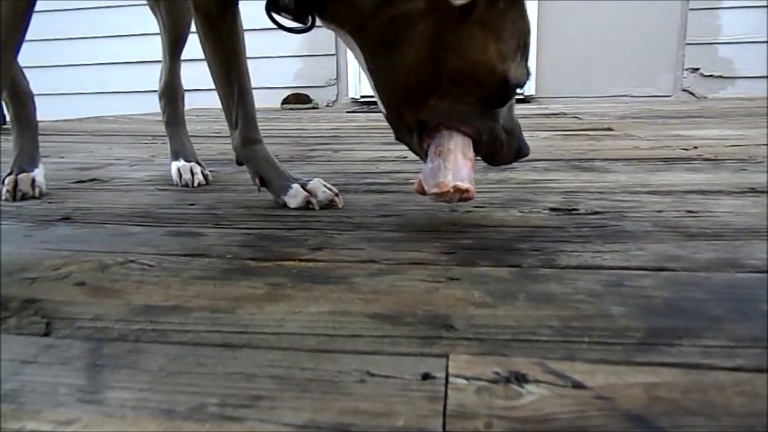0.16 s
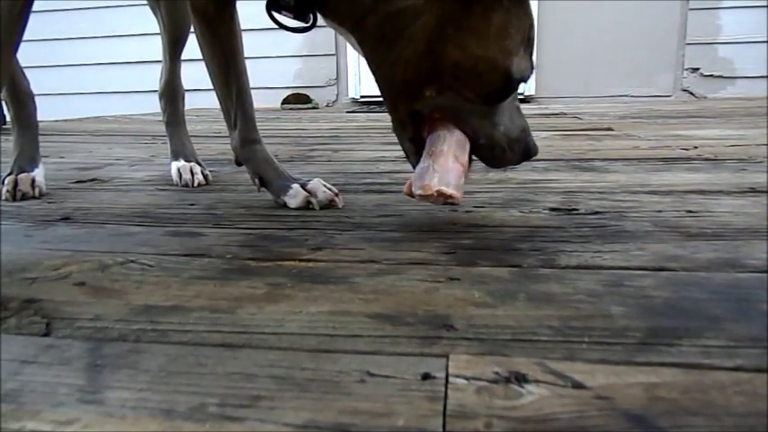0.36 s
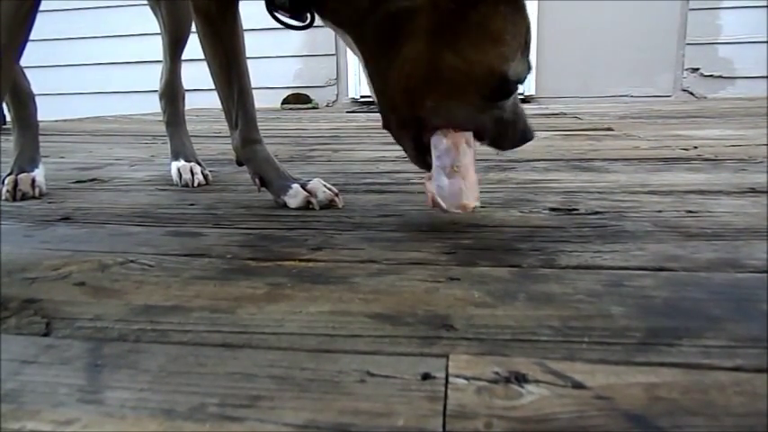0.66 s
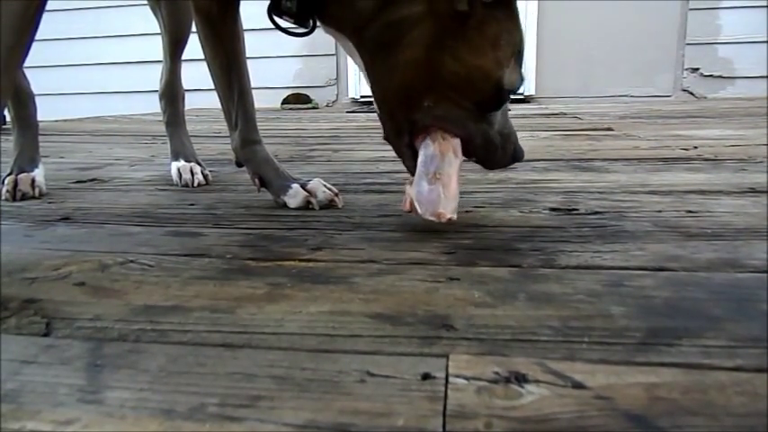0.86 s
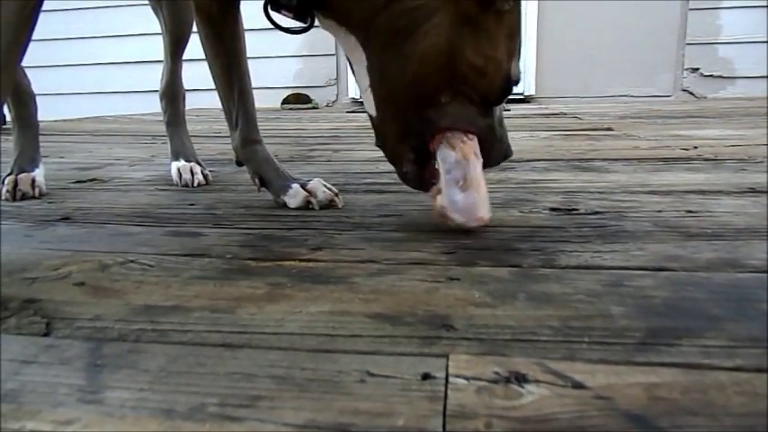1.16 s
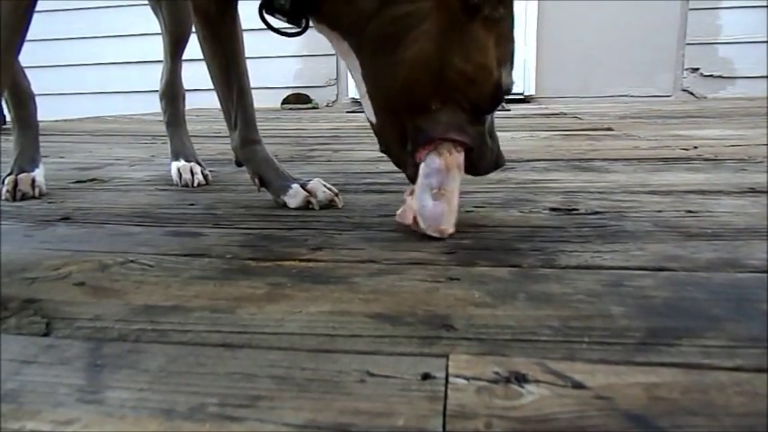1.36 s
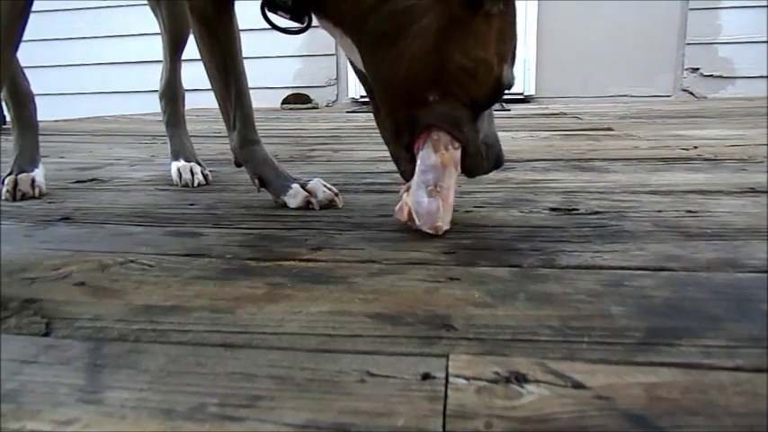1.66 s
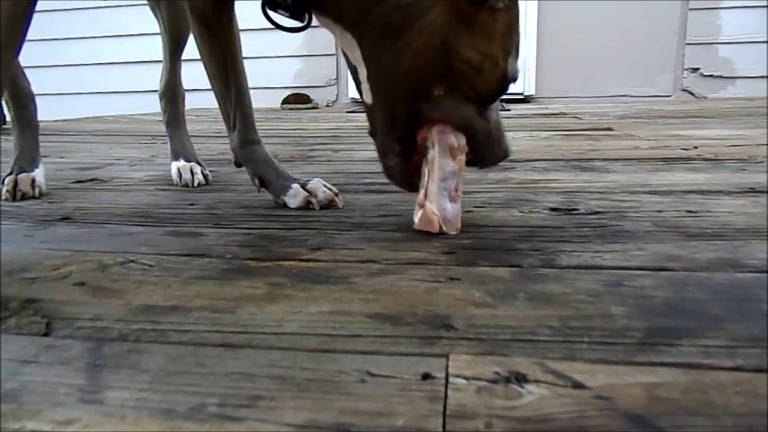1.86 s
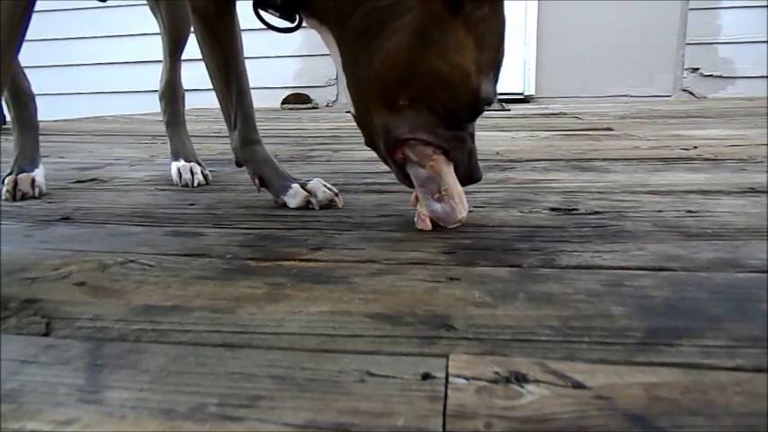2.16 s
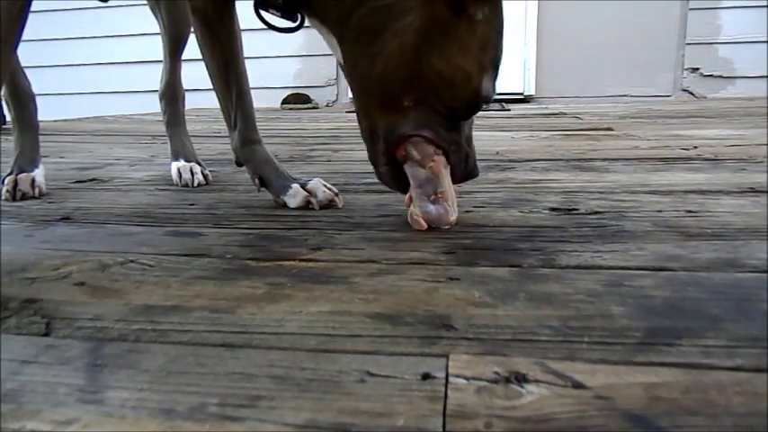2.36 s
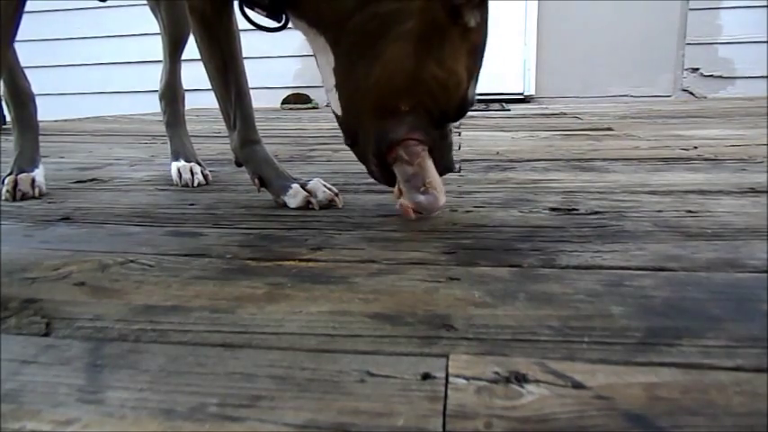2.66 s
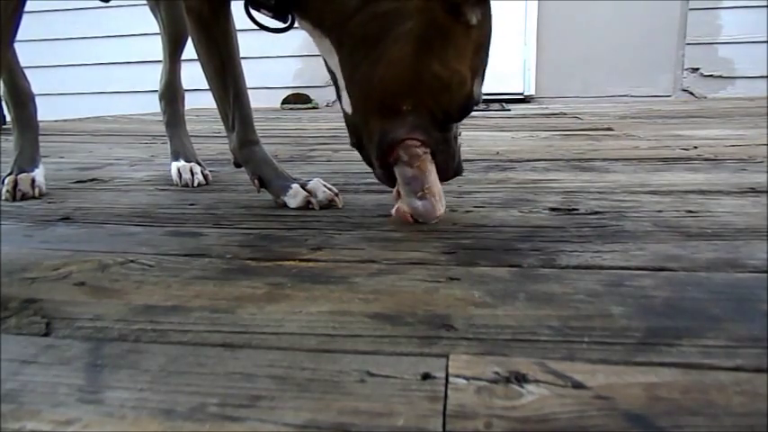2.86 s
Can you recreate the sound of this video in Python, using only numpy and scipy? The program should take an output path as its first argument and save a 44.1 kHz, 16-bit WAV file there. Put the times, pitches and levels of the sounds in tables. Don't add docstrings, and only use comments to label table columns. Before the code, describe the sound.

A dog crunches a raw bone close to a small stereo microphone on a wooden deck: loud snaps early and midway, gristly grinding and faint lip smacks between, then gusts thump the right channel over soft outdoor hiss.

```python
import sys
import numpy as np
from scipy import signal
from scipy.io import wavfile
from scipy.ndimage import uniform_filter1d

SR = 44100
rng = np.random.default_rng(int(sys.argv[2]) if len(sys.argv) > 2 else 0)


def dump_mix(stems):
    frames = np.atleast_2d(stems).T
    limited = np.clip(frames, -1, 1)
    pcm = np.round(limited * 32767).astype(np.int16)
    wavfile.write(sys.argv[1], SR, pcm)


def amplitude_ratio(level_db):
    exponent = np.asarray(level_db, float) / 20
    return 10 ** exponent


N = 132300


def evened(x):
    return x / np.sqrt(np.mean(x ** 2) + 1e-20)


def peak_evened(x):
    return x / np.sqrt(uniform_filter1d(x ** 2, 80).max())


def smooth_noise(count, width):
    return evened(uniform_filter1d(uniform_filter1d(rng.standard_normal(count), width), width))


def read(points, hz):
    f, value = np.transpose(points)
    return np.interp(np.log(hz + 1), np.log(f + 1), value)


def curve(points):
    return amplitude_ratio(np.interp(np.arange(N) / SR, *np.transpose(points)))


def add(mix, s, sound):
    part = mix[round(s * SR):][:len(sound)]
    part += sound[:len(part)]


def colour(x, points):
    hz = abs(np.fft.fftfreq(4096, 1 / SR))
    log_gain = np.log(amplitude_ratio(read(points, hz)))
    taps = np.fft.ifft(np.exp(np.conj(signal.hilbert(log_gain)))).real[:1024]
    return signal.oaconvolve(x, taps)[:len(x)]


# frequency in Hz, density in dB per Hz.
AIR_COLOUR = [(53, -43), (100, -17), (200, -9), (453, 0), (550, -5.5), (667, -7.5), (1050, -11),
              (15500, -21)]
# frequency in Hz, left-right likeness from 0 to 1.
LIKENESS = [(60, 0.57), (380, 0.99), (2380, 0.028), (15000, 0.024)]
# time in seconds, gain in dB.
GAIN = [(0, 1.5), (.5, -2.5), (1.15, -4.5), (1.3, 1), (1.85, -0.5), (1.92, -12.5), (2.08, -13.5),
        (2.12, -1.5), (2.53, -6.5), (2.65, -2.5), (3, -0.5)]
AIR_DB = -42


def air():
    frames, hz = N // 128 + 5, np.fft.rfftfreq(512, 1 / SR)
    a, b, c, d, patches = rng.standard_normal((frames, 257, 5)).T
    patches = evened(uniform_filter1d(uniform_filter1d(patches, 30, 0), 12, 1))
    hiss_swell = smooth_noise(frames, 12) * (hz > 2500)[:, None]
    same = np.clip(read(LIKENESS, hz), -1, 1)[:, None]
    left = a + 1j * b
    right = same * left + np.sqrt(1 - same ** 2) * (c + 1j * d)
    level_db = read(AIR_COLOUR, hz)[:, None] + 1.7 * patches + 0.9 * hiss_swell
    spectra = np.array([left, right]) * amplitude_ratio(level_db)
    wash = signal.istft(spectra, nperseg=512, noverlap=384)[1][:, :N]
    return amplitude_ratio(AIR_DB) * curve(GAIN) * evened(wash)


# time in seconds, level in dB.
BREEZE = [(0, -58), (.5, -47.5), (.75, -39.5), (1.1, -28.5), (1.2, -46.5), (1.5, -38.5), (1.82, -42),
          (1.88, -23), (2.3, -42), (2.46, -30.5), (2.5, -60.5), (2.56, -33.5), (2.75, -29), (2.8, -45),
          (2.86, -28.5), (3, -35.5)]
BREEZE_HZ, BREEZE_WIDTH_HZ, LUMPS_DB = 212.3, 193, 3.5


def breeze():
    edges = [BREEZE_HZ - BREEZE_WIDTH_HZ / 2, BREEZE_HZ + BREEZE_WIDTH_HZ / 2]
    band = signal.butter(2, edges, "band", fs=SR, output="sos")
    lumps = amplitude_ratio(LUMPS_DB * smooth_noise(N, 400))
    rumble = signal.sosfilt(band, rng.standard_normal(N))
    return curve(BREEZE) * evened(lumps * rumble)


def eddy(s, db, hz):
    t = np.arange(-500, 700) / SR
    phase, side = rng.random(2)
    turns = t * hz / 0.8
    swell = np.exp(-turns ** 2 * np.where(turns < 0, 1.8, 1.3))
    thump = swell * np.cos(2 * np.pi * (hz * t + 0.22 * (phase - 0.5))) * np.sign(side - 0.5)
    return s + t[0], amplitude_ratio(db) * thump


# start in seconds, level in dB.
SLAPS = [
    (1.905, -7.5),
    (1.9235, -16),
    (1.9995, -11),
    (2.002, 0),
    (2.0332, -13.5),
    (2.4532, -7.5),
    (2.455, -5.5),
    (2.737, -12.5),
]
SLAP_HZ, SLAP_DECAY_S = 720, 0.00091


def slap(s, db):
    t = np.arange(400) / SR
    envelope = (1 - np.exp(-t / 0.00005)) * np.exp(-t / SLAP_DECAY_S)
    return s, amplitude_ratio(db) * envelope * np.sin(2 * np.pi * SLAP_HZ * t)


# centre
# in seconds, level in dB, pitch in Hz.
EDDIES = [(0.3209, -21, 220), (0.3553, -11.5, 247), (0.7043, -20.5, 206), (0.785, -17.4, 246),
          (0.884, -17.8, 278), (0.9035, -17, 259), (0.9102, -25, 244), (0.989, -13.5, 228),
          (1.0008, -20, 240), (1.0364, -26, 199), (1.0503, -22, 234), (1.0521, -7.5, 254),
          (1.06, -25, 231), (1.0773, -16, 248), (1.0986, -26.5, 297), (1.1058, -19.9, 298),
          (1.113, -11.5, 275), (1.122, -9, 273), (1.4615, -18, 288), (1.8696, -17, 236),
          (1.8794, -13, 332), (1.8902, -11.5, 300), (1.8946, -14, 217), (1.9067, -5, 377),
          (1.918, -6.5, 370), (1.9264, -9, 254), (1.9388, -12, 312), (1.9458, -22, 371),
          (1.9685, -11.8, 297), (1.9799, -11.4, 280), (1.988, -19, 248), (2.0038, -5.5, 304),
          (2.0117, -11, 274), (2.0199, -18, 298), (2.0351, -12, 283), (2.0729, -22, 267),
          (2.0848, -20, 290), (2.0995, -23, 264), (2.1111, -15.5, 245), (2.125, -11, 324),
          (2.149, -19, 278), (2.1605, -19, 265), (2.1829, -5.5, 312), (2.191, -5, 370),
          (2.211, -27, 292), (2.219, -15.5, 309), (2.2602, -11.5, 256), (2.2666, -14, 306),
              (2.2728, -2, 330), (2.2838, -9, 268), (2.318, -19, 259), (2.3312, -10.5, 343),
              (2.3447, -13.1, 324), (2.4053, -24, 277), (2.4151, -11.5, 301), (2.4212, -24, 260),
              (2.4404, -21.1, 333), (2.4493, -17, 207), (2.4557, -7.5, 292), (2.4629, -14.5, 280),
              (2.562, -24, 345), (2.58, -12, 334), (2.6255, -32, 221), (2.641, -21.0, 210),
              (2.6606, -13.5, 312), (2.6707, -8.5, 370), (2.679, -11.5, 229), (2.694, -10.7, 308),
              (2.706, -12, 274), (2.72, -19.8, 259), (2.7305, -27, 243), (2.7381, -9, 290),
              (2.75, -28, 207), (2.8473, -12, 259), (2.866, -25, 239), (2.913, -16, 262),
              (2.9688, -19, 250), (2.9946, -22, 261)]
LEAK_DB = -33


def wind():
    right = breeze()
    for row in EDDIES:
        add(right, *eddy(*row))
    for row in SLAPS:
        add(right, *slap(*row))
    return np.array([amplitude_ratio(LEAK_DB) * right, right])


# start in seconds, level in dB, pitch in Hz.
SMACKS = [
    (0.093, -29, 13800),
    (0.379, -38, 11600),
    (.387, -40, 10600),
    (0.716, -28, 6480),
    (1.927, -37, 12400),
]


def smack(s, db, hz):
    t = np.arange(900) / SR
    fizz = uniform_filter1d(rng.standard_normal(len(t)), 14) * 4 * np.sin(2 * np.pi * hz * t)
    click_and_tail = np.exp(-t / 0.0011) + 0.29 * np.exp(-t / 0.01)
    return s, amplitude_ratio(db) * fizz * click_and_tail


# time in seconds, level in dB.
GRIND = [(0, -48), (.08, -33), (.3, -44.5), (.85, -42), (1.44, -42), (1.5, -33.5), (1.66, -39.5),
         (1.8, -50), (2.08, -56.5), (2.13, -63), (2.26, -41.5), (2.4, -55.5), (2.67, -43.5), (2.8, -55),
         (2.86, -47.5), (3, -44.5)]
# frequency in Hz, level in dB.
GRIND_COLOUR = [(300, -25.5), (800, 2.5), (1500, -7.5), (3000, -10), (6000, -14), (15000, -11)]
TICKS_PER_S = 1400


def grinding():
    tick_level = amplitude_ratio(4 * np.minimum(rng.exponential(1, N), 2.5))
    ticks = (rng.random(N) < TICKS_PER_S / SR) * tick_level
    clumps = amplitude_ratio(1.7 * smooth_noise(N, 300))
    puffs = signal.lfilter([1], [1, -0.96], ticks) * rng.standard_normal(N)
    return curve(GRIND) * evened(colour(clumps * puffs, GRIND_COLOUR))


# multiple of the mouth pitch, level in dB, 60 dB decay in seconds.
MOUTH = [(.62, -9.5, .013), (1.001, 7, 0.019), (1.3, -13, 0.02)]
# frequency in Hz, level in dB.
SNAP_COLOUR = [(700, -10), (1550, -3), (2600, -2), (4200, -5.5), (6000, -9), (9000, -7), (11000, -7.5),
               (15500, -7.5)]
FRACTURE_S = 0.001183
SPLINTER_DB, SPLINTER_T60, BONE_DB, BONE_T60 = -23.5, 0.085, -0.5, 0.013
DEEPER_S = 1.6


def crack(s, ring_db, mouth_hz, snap_db, bone_hz):
    t = np.arange(3000) / SR
    snap_noise, push_noise, splinter_noise, roughness = rng.standard_normal((4, len(t)))
    onset = np.minimum(t / FRACTURE_S, 1)
    run = (t / FRACTURE_S) ** 2 * np.exp(2 - 2 * t / FRACTURE_S)
    flutter_db = 35 * uniform_filter1d(splinter_noise, 60)
    splinters = amplitude_ratio(SPLINTER_DB - 60 * t / SPLINTER_T60 + flutter_db) * onset

    grit = snap_noise * abs(roughness)
    debris = signal.lfilter([1], [1, -0.5], grit * splinters)
    snap = colour(grit * run ** 2 + debris, SNAP_COLOUR)
    dull = np.clip(-snap_db / 110 + 0.5 * (s > DEEPER_S), 0, 0.85)
    snap = peak_evened(signal.lfilter([1], [1, -dull], snap))

    modes = sum(amplitude_ratio(db - 60 * t / t60) * np.sin(2 * np.pi * k * mouth_hz * t) for k, db, t60 in MOUTH)
    jolt = 8 * np.exp(-((t - FRACTURE_S / 2) / 0.00013) ** 2)
    push = push_noise * (0.3 * run + 0.8 * splinters) + jolt
    ring = peak_evened(signal.oaconvolve(push, modes * onset)[:len(t)])
    bone_mode = amplitude_ratio(-60 * t / BONE_T60) * np.sin(2 * np.pi * bone_hz * t)
    bone = peak_evened(signal.oaconvolve(push, bone_mode)[:len(t)])
    return s - 0.0004, amplitude_ratio(ring_db) * ring + amplitude_ratio(snap_db - 4) * (snap + amplitude_ratio(BONE_DB) * bone)


DECK_DB, DECK_T60 = -13, 0.08


def deck(x):
    t = np.arange(5000) / SR
    echoes = rng.choice([-1., 1.], (2, len(t))) * (rng.random((2, len(t))) < 0.06) * (t > 0.0003)
    echoes *= amplitude_ratio(-60 * t / DECK_T60) + 3 * amplitude_ratio(-60 * t / 0.0078)
    taps = amplitude_ratio(DECK_DB) * echoes / np.linalg.norm(echoes[0])
    taps[0, 0], taps[1, 0], taps[1, 1] = 1, 0.5, 0.5
    return signal.fftconvolve(x[None], taps, axes=1)[:, :N]


# start in seconds, mouth ring in dB,
# mouth pitch in Hz, snap in dB, bone pitch in Hz.
CRACKS = [(0.058, -49, 1620, -18, 2760), (.0705, -53.5, 1200, -28, 1930),
          (0.0799, -34, 1170, -23, 2825), (0.0995, -29.5, 640, -43, 1200),
          (.1165, -45, 720, -45, 1200), (0.1366, -57, 1700, -34, 3140),
          (0.1769, -27, 1270, -17.5, 2670), (0.191, -32, 1210, -20, 2580),
          (0.2028, -5.5, 740, -3, 1570), (0.2681, -13.5, 1127, -8, 2610), (0.343, -33, 925, -54, 1300),
          (0.4261, -26, 1066, -43, 800), (0.8295, -23.5, 966, -21, 1520), (0.85, -6, 908, -5, 1600),
          (0.8638, -24, 935, -38, 1600),
          (1.3096, -16, 973, -25, 2370), (1.3572, -6.5, 908, -14.5, 2370),
               (1.4752, -8.5, 880, -6, 1430), (1.5141, -25, 920, -41, 1900), (1.5239, -31, 850, -32, 2200),
               (1.5446, -40, 806, -19.5, 1960), (1.551, -26, 805, -19.5, 2340),
               (1.5733, -29, 684, -30, 2060), (1.6148, -13.5, 562, -13, 1440),
               (1.6282, -23, 593, -18, 1310), (1.6461, -32, 400, -28, 1700), (1.8209, -32.5, 785, -46, 995),
               (1.9495, -34, 1050, -55, 1190), (2.1245, -27, 1095, -35, 1900),
               (2.1404, -28, 870, -26, 2010), (2.1593, -32, 860, -29.5, 3450),
               (2.286, -24.5, 660, -34, 1100), (2.5832, -29, 560, -35.5, 1540),
               (2.8473, -27.5, 670, -26.5, 3670), (2.8536, -26, 720, -24.5, 1590),
               (2.8797, -26.5, 610, -34, 1500),
          (1.608, -15.5, 617, -13.5, 2000), (0.2048, -10.5, 555, -4, 2175), (.8505, -39, 930, -3, 2676),
          (1.483, -32, 870, -20, 1890), (1.486, -18.5, 1080, -14, 3860), (1.492, -34, 1020, -25, 1610),
          (1.611, -22, 618, -15.5, 1410), (1.634, -26, 554, -26, 1170), (2.106, -39, 1080, -37.5, 1510),
          (2.112, -36, 1200, -34, 3550), (2.156, -50, 910, -28, 1610), (2.244, -36, 1140, -47, 2000),
          (2.263, -44, 1530, -35, 3600), (2.29, -34, 915, -37, 1770), (2.858, -31, 680, -28, 1390),
          (2.866, -38, 696, -33.5, 1810), (2.894, -39, 810, -42, 1200)]


def dog():
    mouth = grinding()
    for row in CRACKS:
        add(mouth, *crack(*row))
    for row in SMACKS:
        add(mouth, *smack(*row))
    return signal.sosfilt(signal.butter(2, 330, "high", fs=SR, output="sos"), mouth)


# frequency in Hz, level in dB over the left.
RIGHT_PORT = [(100, 4.5), (500, 4), (1500, 2.5), (3000, 0), (8000, -4), (15000, -4.5)]


def scene():
    left, right = air() + deck(dog())
    return np.array([left, colour(right, RIGHT_PORT)]) + wind()


def top_cut(x):
    return signal.sosfilt(signal.butter(12, 16000, fs=SR, output="sos"), x)


def record(dry):
    low_cut = signal.butter(2, 108, "high", fs=SR, output="sos")
    band_limit = signal.firwin(255, 15800, window=("kaiser", 9), fs=SR)
    x = signal.sosfilt(low_cut, dry)
    x = signal.oaconvolve(x, band_limit[None], "same")
    return top_cut(np.clip(x, -1, 1))


dry = scene()
out = record(dry)
dump_mix(out)
```